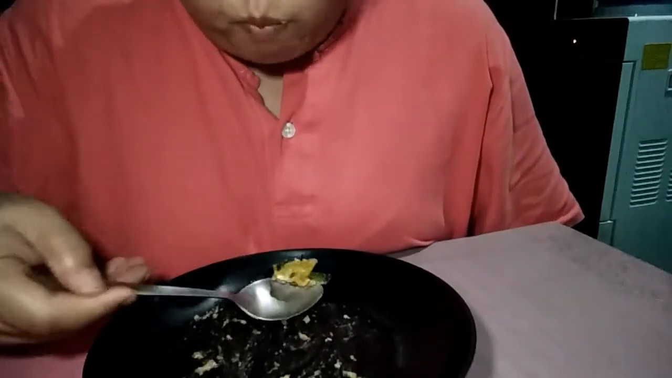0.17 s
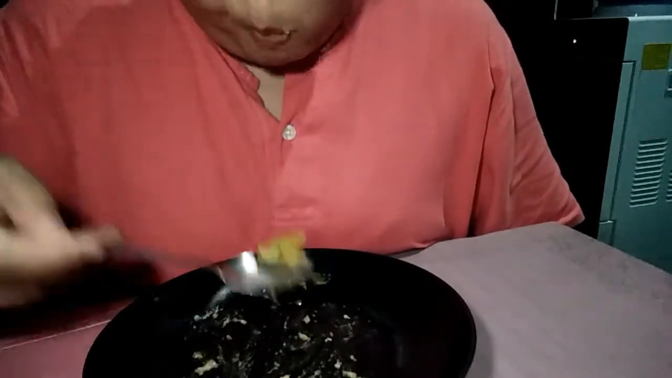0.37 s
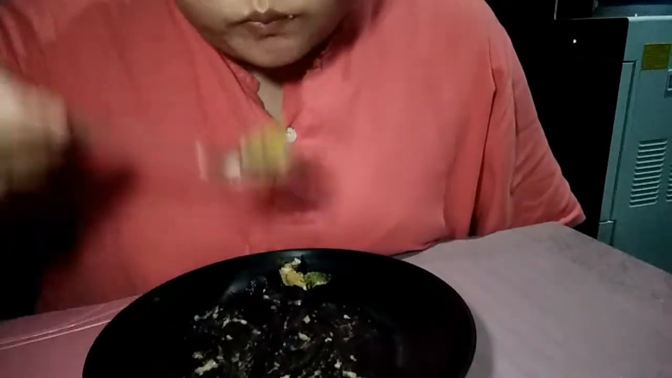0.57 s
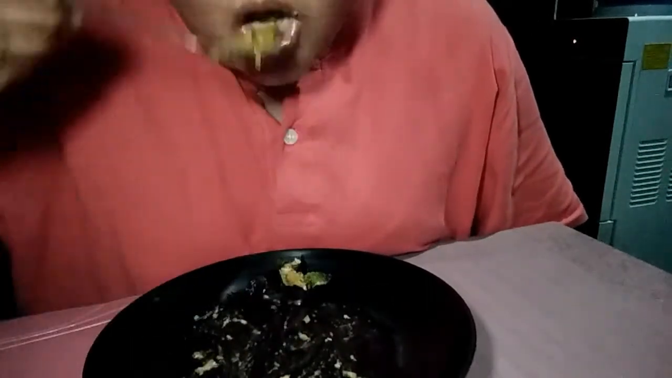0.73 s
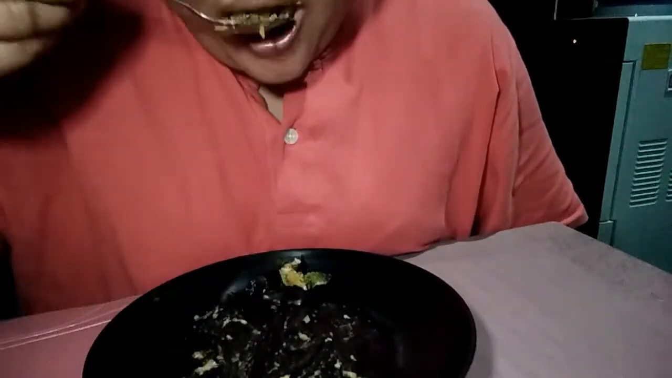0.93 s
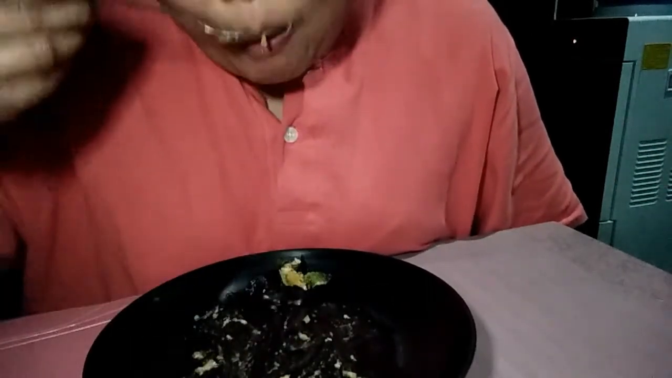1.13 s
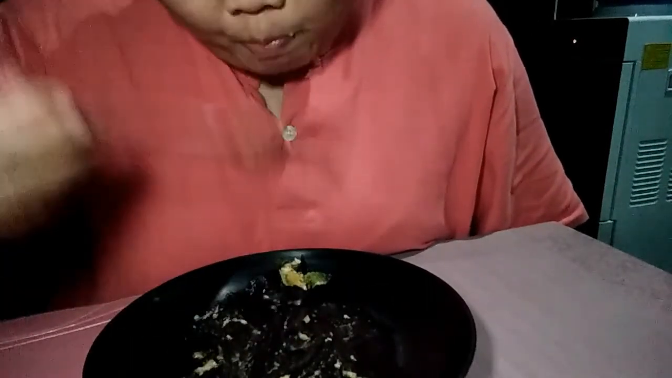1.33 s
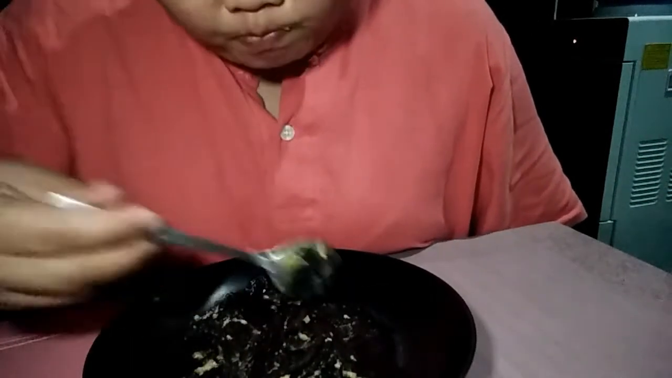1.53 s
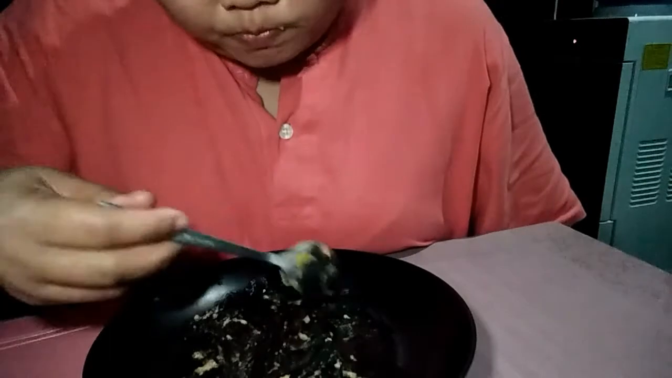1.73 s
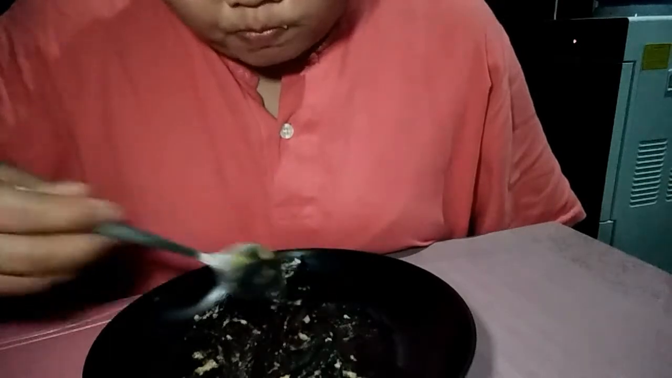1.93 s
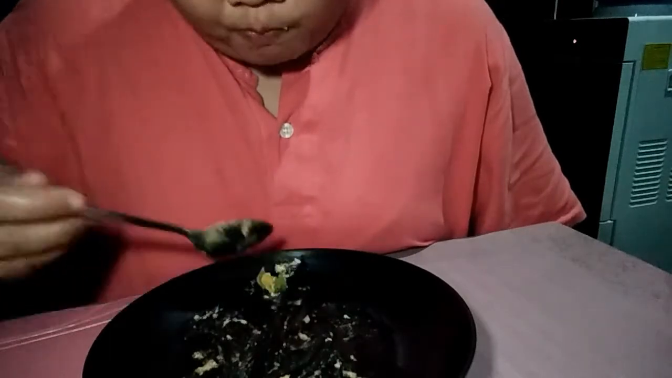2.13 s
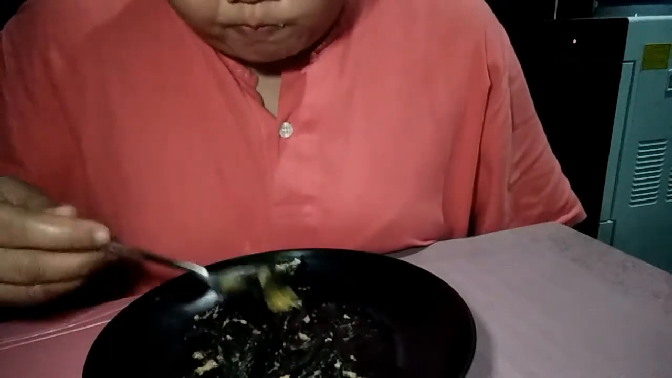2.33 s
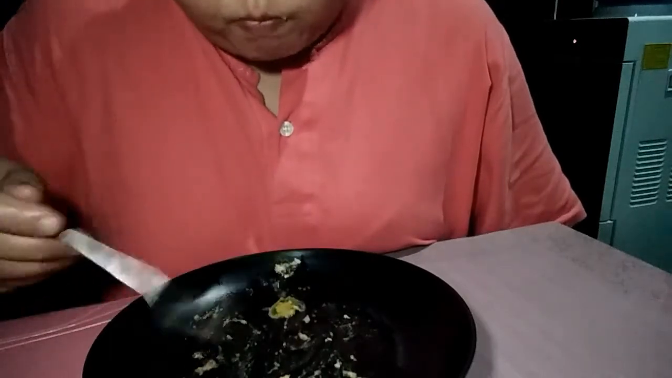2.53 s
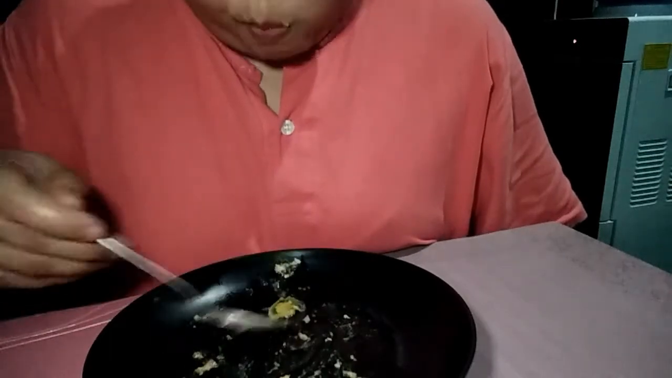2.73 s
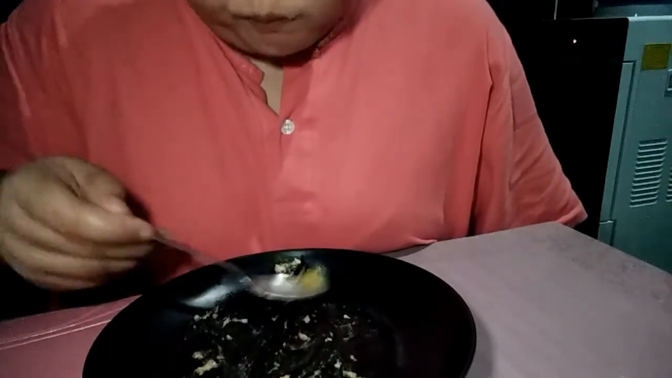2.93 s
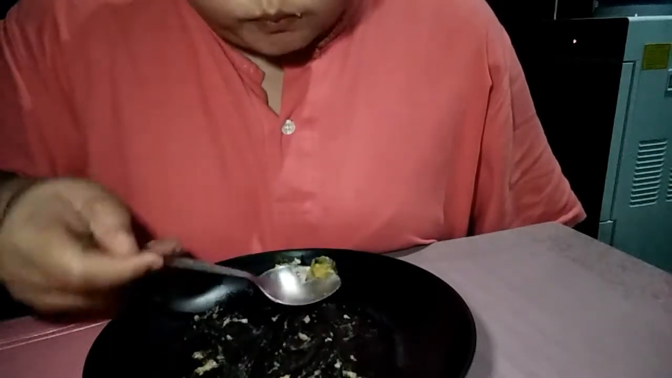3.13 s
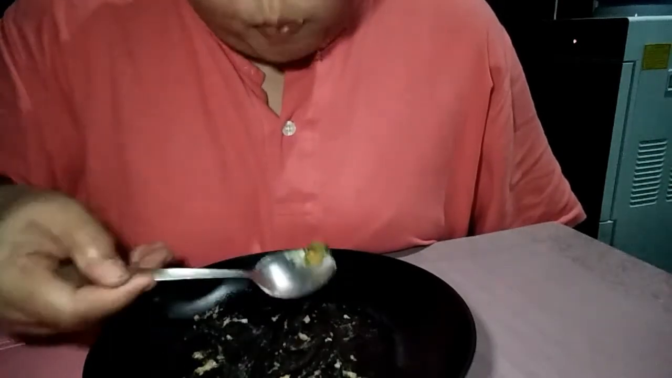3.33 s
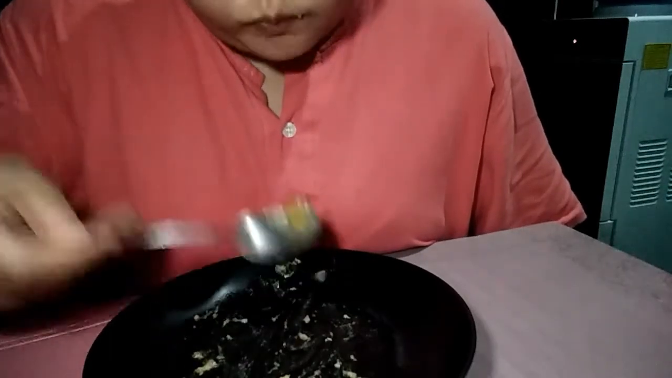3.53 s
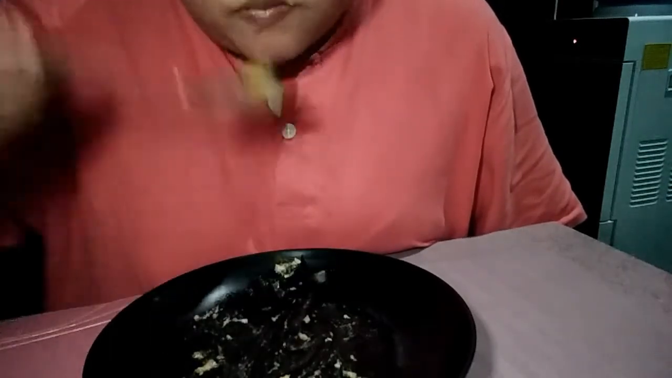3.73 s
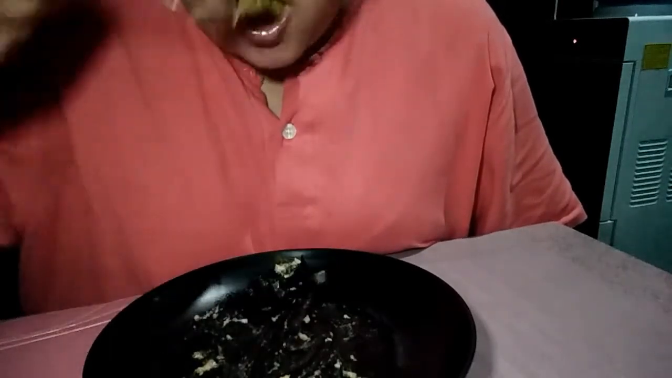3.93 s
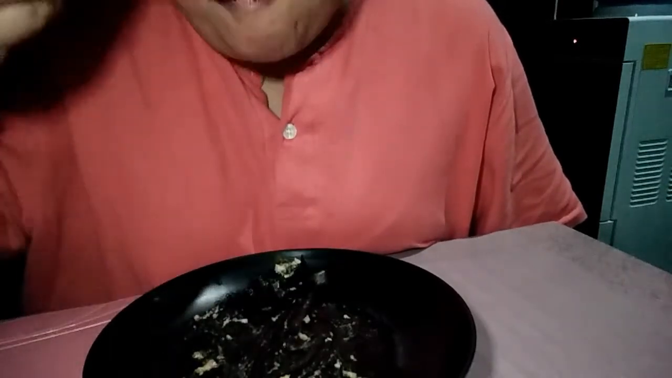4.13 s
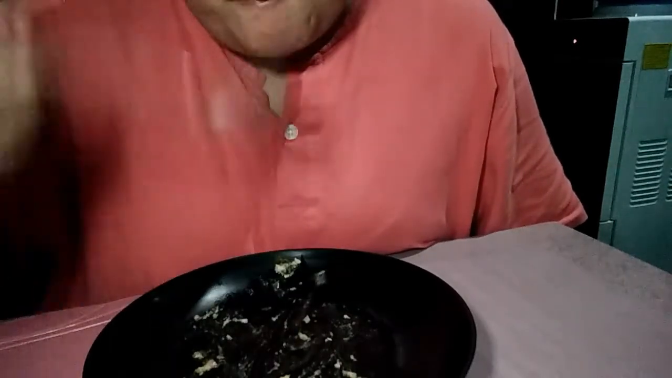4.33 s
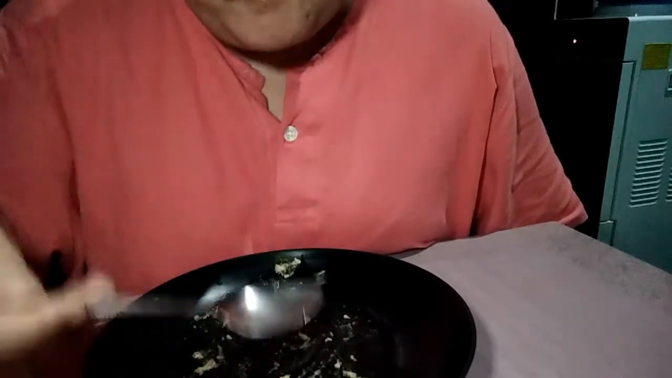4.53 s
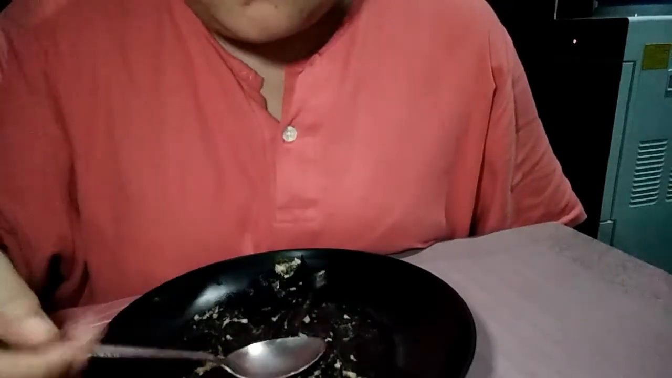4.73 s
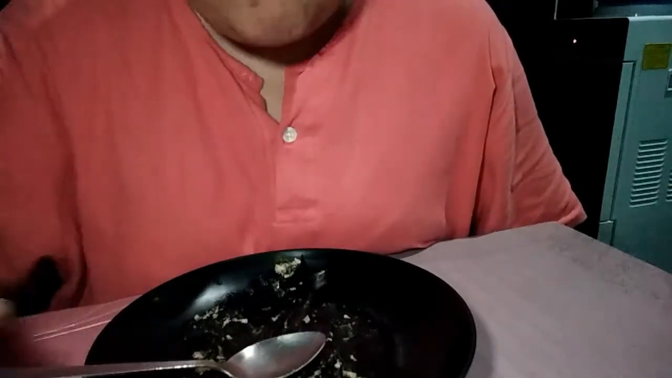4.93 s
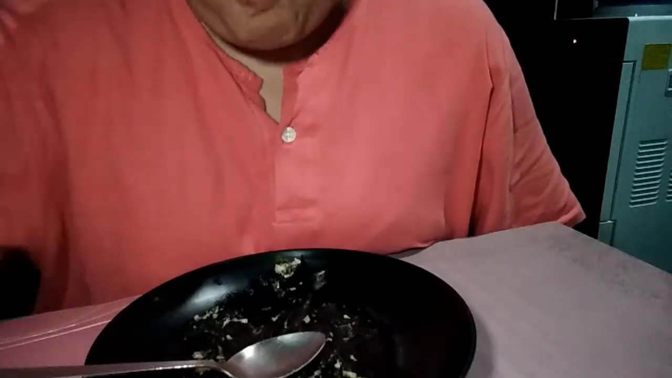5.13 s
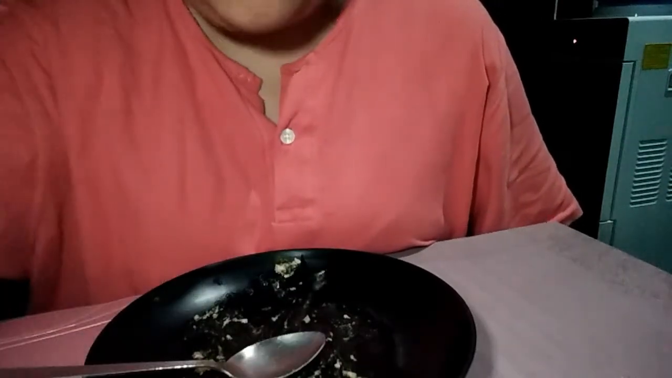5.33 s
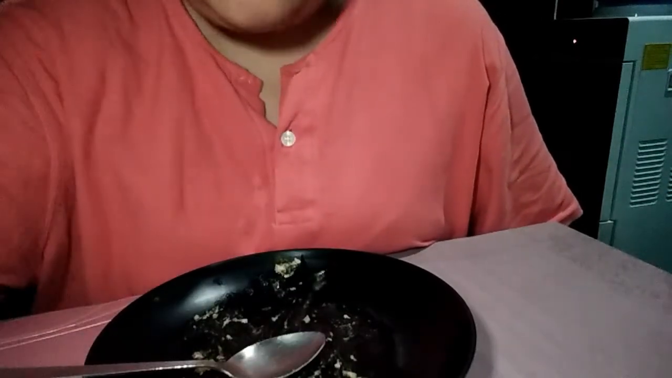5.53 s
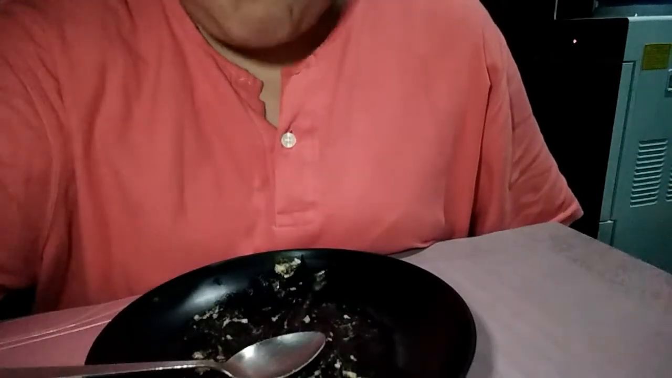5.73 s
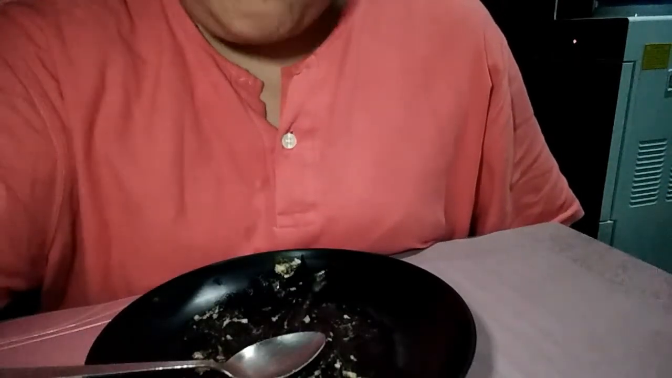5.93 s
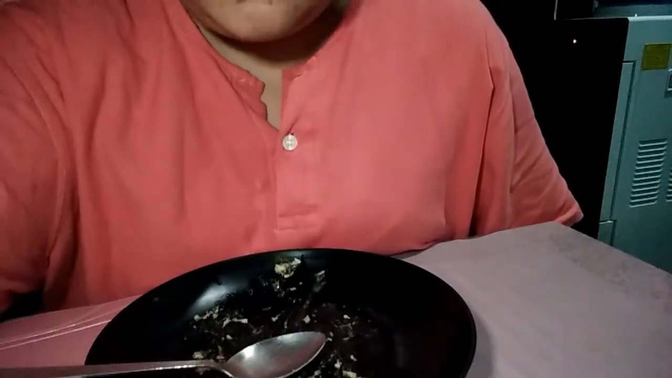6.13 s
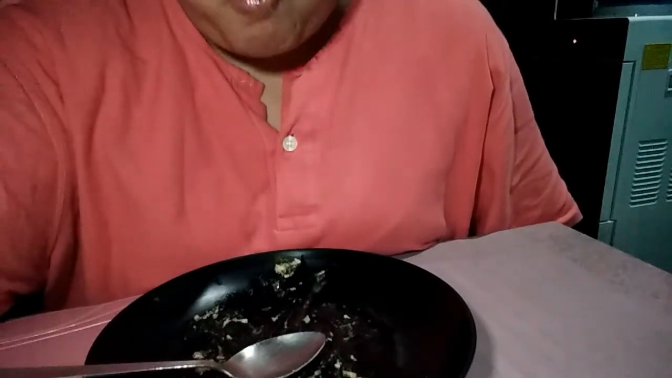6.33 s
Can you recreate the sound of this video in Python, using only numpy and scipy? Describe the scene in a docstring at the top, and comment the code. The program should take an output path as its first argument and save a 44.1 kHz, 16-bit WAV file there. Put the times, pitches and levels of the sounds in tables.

```python
"""Spoon on a plate

Ticks and a fine rustle at the mouth come before and after a steel spoon taps and scrapes a plate three times;
then it is dropped on the rim, where it bounces. Scrapes and blows are noisy forces on resonant bodies.
Ticks are damped tones, the rustle is swelling noise. Noise tails make a small room, over a faint machine hum and
a dull rush of air; a suppressor trims faint treble. The sound is narrow below about 4 kHz, wide in the treble."""
import sys
import numpy as np
from scipy import signal
from scipy.fft import rfft, irfft, next_fast_len
from scipy.io import wavfile
from scipy.ndimage import uniform_filter1d, map_coordinates

SR = 44100
rng = np.random.default_rng(int(sys.argv[2]) if len(sys.argv) > 2 else 0)


def wav_record(signal):
    """Record a signal, one row per channel, as 16-bit PCM in the file named by sys.argv[1]."""
    frames = np.transpose(np.atleast_2d(signal))
    bounded = np.clip(frames, -1, 1)
    # unit amplitude maps onto the largest positive 16-bit level
    quanta = np.round(bounded * 32767).astype(np.int16)
    wavfile.write(sys.argv[1], SR, quanta)


N = 286209

# hard blows: start_s, edge_force_db, then over that force neck_db, bowl_db, rim_db, plate_db;
# free_ring_db, contact_ms
BLOWS = [(1.7438, 3, 1.5, 8.5, 14.8, 13, -59, 0.55), (2.3431, -6.5, 1.5, 1, 17.7, 14.5, -69, .27),
         (2.705, -19, 5, 22, 28.4, 23, -75, .77), (4.8898, 14, -6, -0.5, 11, -11.5, -32, 2.4),
         (4.9206, 9, -8, -5, 9.7, -6.5, -45, 1.3), (4.9393, 1.5, -2, 0, 15.4, -5, -40, 1.8),
         (4.953, -15.5, -8, 5, 25, 13, -77, 2.5)]
# resonances of the plate's centre: pitch_hz, width_hz, level_db
PLATE = [(424, 53, -14.5), (610, 150, -9.5), (708, 76, -4), (936, 130, 4.5), (1066, 280, 0.5),
         (1253, 180, 1)]
# resonances of the plate's rim: pitch_hz, width_hz, level_db
RIM = [(1267, 82, -11), (1842, 70, 1), (2317, 150, -5.5), (2777, 120, -7.5), (3435, 120, -11)]
# resonances of the spoon's bowl: pitch_hz, width_hz, level_db
BOWL = [(2777, 95, -2), (3074, 170, -5), (3568, 72, 0), (3830, 180, -5.5), (4207, 110, 0.5),
        (4600, 130, -4)]
# resonances of the spoon's edge: pitch_hz, width_hz, level_db
EDGE = [(8150, 1100, 2), (9480, 400, 5.5), (10160, 110, 2), (10260, 360, 2), (11430, 600, -3.5),
        (12100, 220, -5), (12910, 400, -5)]
# resonances of the spoon's neck: pitch_hz, width_hz, level_db
NECK = [(5300, 350, -3), (5850, 350, -3), (6540, 350, 0), (7100, 450, -1)]


def scraping():
    """Friction: slips of the sliding edge excite the resonances of spoon and plate."""
    # strokes over the glaze: pressure of the edge as (time_s, hiss_db) points;
    # then, by the hold of the spoon, levels over the hiss: (neck_db, upper_bowl_db, lower_bowl_db, plate_db)
    strokes = [ ([(1.757, -48), (1.8, -55), (1.833, -48), (1.86, -51), (1.887, -52)], (-1, -6, -13, -4.5)),
               ([(1.887, -55), (1.92, -49.5), (1.945, -50), (1.965, -48), (1.973, -56.5)],
               (-3.5, -9, -11.5, -5.5)), ([(2.35, -42.5), (2.38, -40.5)], (1.5, -10, -10, -6)),
               ([(2.38, -44.5), (2.395, -39), (2.415, -35), (2.433, -37.5), (2.447, -62)],
               (-3, -2.5, -7.5, -9.5)), ([(2.72, -61), (2.775, -65.5), (2.8, -63), (2.82, -60)],
               (-13.5, -9.5, -5.5, 2)), ([(2.82, -56), (2.83, -52), (2.855, -57.5), (2.862, -59),
               (2.872, -61.5), (2.895, -64), (2.91, -68)], (-12.5, -3.5, 0, -11)), ([(2.915, -49.5),
               (2.92, -56.5), (2.935, -60), (2.945, -62.5)], (-9.5, 1.5, -4.5, -8.5)), ([(2.947, -61),
               (2.96, -55.5), (2.978, -59.5), (2.993, -58), (3.015, -66)], (4.5, 4, -0.5, -5)),
               ([(3.015, -60.5), (3.031, -41.5), (3.058, -34), (3.074, -40.5), (3.096, -57.5), (3.11, -66)],
               (-6.5, -9, -12, -19.5)), ([(4.81, -69.5), (4.835, -64), (4.853, -56), (4.88, -66.5)],
               (-16, -24, -19, -6.5)), ]
    # the edge's top modes lie under the hiss at a firm pressure and grow more slowly than it
    firm_db, top_under_db, top_growth = -50.5, -8.5, 0.83
    rim_db = -3.5  # the rim under the plate's centre
    chatter_db, chatter_s = 14.5, 0.035  # the plate shakes harder just after a blow
    wander_db, wander_hz = 0.5, 23  # each share drifts as the contact moves
    slips = grit(rough_db=1.9, patchy_db=2.6)
    bodies = EDGE[:4], EDGE[4:], NECK, BOWL[2:], BOWL[:2], PLATE, RIM[1:3]
    drive = np.zeros((len(bodies), N))
    t = np.arange(N) / SR
    for pressure, (neck_db, upper_db, lower_db, plate_db) in strokes:
        db, = curves(pressure)
        top_db = firm_db + top_under_db + top_growth * (db - firm_db)
        spoon = [db, top_db, db + neck_db, db + upper_db, db + lower_db]
        drive += amp(spoon + [db + plate_db, db + plate_db + rim_db])
    shake_db = sum(chatter_db * np.exp(-np.abs(t - s) / chatter_s) * (t > s) for s, *_ in BLOWS)
    drive[-2:] *= amp(shake_db)
    drive[1:] *= amp([wander_db * wobble(wander_hz) for _ in bodies[1:]])
    out = np.zeros(N)
    for force, body in zip(drive, bodies):
        out += through(force * slips, body) / np.std(through(slips, body))
    return out


def blows():
    """Impact: brief forces excite steel and plate; the freed spoon and the table decay in damped modes."""
    # modes of the free spoon: pitch_hz, level_db, t60_s
    steel = [(4190, -7, .13), (7448, -2, .36), (8900, -5, .07), (9838, 0, .1), (12110, -10, .06)]
    # modes of the table: pitch_hz, level_db, t60_s
    table_top = [(91, -2, 0.049), (167.4, 2.5, 0.075), (199.4, -5, 0.032), (276, -1.5, 0.067),
                 (323, -5, 0.05), (479.7, -2.5, 0.04), (640, -6, 0.065)]
    # soft touches around a blow, or of the hand: start_s, plate_force_db, table_thump_db, contact_ms
    touches = [(1.7368, 1, -42.5, .36), (2.335, -4, -51.5, 0.71), (2.7, -22, -50.5, 0.54),
               (4.783, -10, -32.5, 4.2), (4.883, -9.5, -38, 1.9), (4.905, -20, -40, 2.5)]
    bodies = EDGE, NECK, BOWL, RIM, PLATE
    drive = np.zeros((len(bodies), N))
    out = np.zeros(N + SR)
    t = np.arange(SR // 2) / SR
    ring_rise, thump_rise = 1 - np.exp(-t / 0.011), 1 - np.exp(-t / 0.0039)
    for s, db, *parts_db, ring_db, ms in BLOWS:
        start = round(s * SR)
        force_db = db + np.array([0, *parts_db])
        drive[:, start:][:, :SR // 20] += amp(force_db)[:, None] * contact(ms, count=len(bodies))
        out[start:][:len(t)] += amp(ring_db) * ring_rise * ringing(steel, t)
    for s, plate_db, thump_db, ms in touches:
        start = round(s * SR)
        drive[-1, start:][:SR // 20] += amp(plate_db) * contact(ms, count=1)[0]
        thump = thump_rise * ringing(table_top, t) * (1 + 0.5 * wobble(150)[:len(t)])
        out[start:][:len(t)] += amp(thump_db) * thump
    return out[:N] + sum(through(force, body) for force, body in zip(drive, bodies))


def contact(ms, count):
    """Contact force: a short rattle for each body, with its hardest touch at the height of the contact."""
    u = np.arange(SR // 20) / SR * 1000 / max(ms, 0.05)  # time in contact lengths
    force = u * np.exp(1 - u) * rng.standard_normal((count, len(u)))
    force /= np.linalg.norm(force, axis=1, keepdims=True)
    force[:, round(ms * SR / 1000)] += 1.037 / np.sqrt(ms)
    return force


def ringing(modes, t):
    """Free vibration: exponentially damped modes, at new strengths each time."""
    scatter_db = rng.normal(0, 1.5, len(modes))
    return sum(amp(db + more - 60 * t / t60) * np.sin(2 * np.pi * hz * t)
               for (hz, db, t60), more in zip(modes, scatter_db))


def through(x, modes):
    """Forced resonance: x drives a body that radiates little above its top mode or below its lowest."""
    low, top = modes[0][0], modes[-1][0]

    def response(f):
        peaks = 0
        for k, (hz, width, db) in enumerate(modes):  # neighbours have opposite signs
            peaks = peaks + (-1) ** k * amp(db) * 1j * f * width / (hz * hz - f * f + 1j * f * width)
        return peaks / (1 + 1j * f / top) ** 2 * 1j * f / (low + 1j * f)

    return filtered(x, response)


def ticks():
    """Damped oscillation: each tick is a decaying tone, roughened by noise a few cycles long."""
    # small ticks of spoon, lips and table: start_s, level_db, pitch_hz, t60_s
    tick_list = [(0.416, -39, 1726, 0.018), (0.7658, -37, 6500, 0.0046), (0.775, -42, 9100, 0.0075),
                 (0.7796, -45.5, 2040, 0.0094), (0.7806, -38, 9200, 0.014), (0.779, -40, 6030, 0.0087),
                 (0.8247, -46, 2130, 0.0081), (0.823, -48, 5300, 0.0051), (0.86, -45.5, 8600, 0.01),
                 (0.8844, -55, 7600, 0.0075), (3.8427, -45, 9060, 0.0066), (3.882, -44, 9500, 0.0034),
                 (3.942, -35.5, 10610, 0.0044), (4.0158, -42, 8760, 0.0085), (4.026, -41, 10100, 0.0052),
                 (4.0653, -45, 6940, .01), (5.455, -41, 817, 0.025), (5.8718, -32, 2054, 0.0065),
                 (5.873, -28.5, 1340, 0.015), (5.878, -62, 8850, 0.0072), (6.3717, -52.5, 2370, 0.019),
                 (6.4227, -55, 9400, 0.0064)]
    out = np.zeros(N + SR)
    t = np.arange(SR // 10) / SR
    for s, db, hz, t60 in tick_list:
        rough = map_coordinates(rng.standard_normal(len(t)), [t * hz * 0.4])
        tone = np.sin(2 * np.pi * hz * t) * (0.75 + 0.18 * rough)
        onset = 1 - np.exp(-t * hz)
        out[round(s * SR):][:len(t)] += amp(db - 60 * t / t60) * tone * onset
    return out[:N]


def rustle():
    """Shaped noise: a fine treble fizz in overlapping exponential swells, perhaps lips and cloth."""
    # swells: loudest_s, level_db, rise_s, fall_s (rise and fall each over 20 dB)
    swells = [(0.772, -54.5, 0.011, 0.14), (0.86, -67, .005, .09), (3.338, -64.5, .012, 0.027),
              (3.35, -74, 0.098, 0.19), (3.87, -66.5, 0.23, 0.22), (3.942, -56, 0.016, 0.078),
              (4.018, -55.5, 0.0049, .035), (4.17, -69, 0.33, 0.13), (4.49, -73, 0.048, .4),
              (4.66, -81, 0.22, 0.041), (4.793, -57.5, .03, 0.028), (5.79, -77, 0.24, 0.045),
              (5.874, -67.5, .03, 0.066), (6.32, -76.5, .045, 0.14), (6.424, -77, 0.022, 0.037)]
    # spectrum of the fizz: pitch_hz, relative_level_db
    fizz_shape = [(2650, -43.5), (4500, -13), (4750, -23), (8840, -3.5), (10800, -9.5), (11300, -10),
                  (13700, -13.5), (14500, -9.5)]
    t = np.arange(N) / SR
    level = sum(amp(db - 20 * np.where(t < s, (s - t) / rise, (t - s) / fall))
                for s, db, rise, fall in swells)
    fizz = filtered(grit(rough_db=2.0, patchy_db=0.5), lambda hz: amp(along(fizz_shape, hz)))
    return level * unit(fizz)


def background():
    """Broadband and tonal noise: dull patchy air, fuzzy narrow bands and an unsteady harmonic machine hum."""
    # spectrum of the rush: pitch_hz, relative_level_db
    air_shape = [(12, -52), (20, -24.5), (27, -15), (87, -13), (151, -8), (174, -28), (302, -9),
                 (377, -21.5), (433, -11), (638, -15), (818, -7), (1590, -10.5), (3360, -35.5), (9370, -37),
                 (15000, -38)]
    # mean levels over time: time_s, rush_db, upper_band_db
    air_level = [(0, -67, -86), (1.4, -66, -81), (3.5, -67.5, -79.5), (4.5, -66, -82.5), (5.7, -65.5, -85),
                 (6.49, -64.5, -76.5)]
    # fuzzy wavering tones in the rush: pitch_hz, width_hz, mean_level_db
    drones = [(572, 75, -78), (822, 54, -75.5), (957, 85, -87), (1330, 29, -85.5), (1750, 100, -91)]
    # partials of the hum: pitch_hz, mean_peak_db
    hum_partials = [(148.3, -75), (296.6, -85.5), (445, -77), (593, -82), (890, -82)]
    low_db, high_db = curves(air_level)
    rush = filtered(grit(rough_db=-0.4, patchy_db=2.5), lambda hz: amp(along(air_shape, hz)))
    upper = filtered(rng.standard_normal(N), lambda hz: np.exp(-(np.log((hz + 1) / 2400) / 0.3) ** 2))
    out = amp(low_db + 0.6 * wobble(2.5)) * unit(rush)
    out += amp(high_db + 3.5 * wobble(1.6)) * unit(upper)
    for hz, width_hz, db in drones:
        narrow = filtered(rng.standard_normal(N), lambda f: np.exp(-((f - hz) / width_hz) ** 2))
        out += amp(db + 3.2 * wobble(3.8)) * unit(narrow)
    t = np.arange(N) / SR
    drift = 0.88 * wobble(3.6)  # radians, at the first partial
    for k, (hz, db) in enumerate(hum_partials, 1):
        out += amp(db + 2.2 * wobble(2.1)) * np.sin(2 * np.pi * hz * t + k * drift)
    return out


def grit(rough_db, patchy_db):
    """Modulated noise: its level clumps in time while its colour wanders in patches."""
    noise = rng.standard_normal(N + 512) * amp(rough_db * np.pad(wobble(400), (0, 512)))
    z = signal.stft(noise, nperseg=256)[2]
    field = uniform_filter1d(rng.standard_normal(z.shape), size=4, axis=0)
    field = uniform_filter1d(field, size=8, axis=1)
    return signal.istft(z * amp(patchy_db * unit(field)), nperseg=256)[1][:N]


def tail(t60s):
    """Diffuse decay: a noise response of energy 1, each frequency dying at its own speed."""
    hz, t, z = signal.stft(rng.standard_normal(SR // 2), SR, nperseg=256)
    answer = signal.istft(z * amp(-60 * t / along(t60s, hz)[:, None]), SR, nperseg=256)[1]
    return answer / np.linalg.norm(answer)


def echo(x, t60s, delay, count=1):
    """Reverberation by convolution, delay samples late; each of count stretches has its own tail."""
    step = N // count + 1  # a fresh noise tail for each stretch keeps the echo smooth
    out = np.zeros(N + SR + delay)
    for i in range(0, N, step):
        part = signal.fftconvolve(x[i:i + step], tail(t60s))
        out[i + delay:][:len(part)] += part
    return out[:N]


def scattered(x):
    """Decorrelation: random phase in every short patch makes a similar sound unrelated to x."""
    z = signal.stft(x, nperseg=128)[2]
    return signal.istft(z * np.exp(2j * np.pi * rng.random(z.shape)), nperseg=128)[1][:N]


def suppressed(x):
    """Spectral gating: the noise suppressor shuts off faint treble, so that tails end early."""
    gate_db, gate_hz = -101, 2893  # patches weaker than this, above this pitch, are turned down
    hz, _, z = signal.stft(x, SR, nperseg=512)
    power = uniform_filter1d(np.abs(z) ** 2, size=24, axis=0)
    power = np.abs(uniform_filter1d(power, size=3, axis=1)) + 1e-30
    gain = 1 / (1 + (amp(gate_db) ** 2 / power) ** 2 * (hz > gate_hz)[:, None])
    return signal.istft(z * gain, nperseg=512)[1][:N]


def amp(db):
    """Logarithmic level: decibels to gain."""
    return 10 ** (np.asarray(db) / 20)


def unit(x):
    """Normalisation of power: x scaled to rms 1."""
    return x / np.sqrt(np.mean(x ** 2) + 1e-30)


def along(points, hz):
    """Logarithmic pitch: (pitch_hz, value) points interpolated on a log axis."""
    f, v = np.transpose(points)
    return np.interp(np.log(hz + 1), np.log(f + 1), v)


def curves(rows):
    """Level envelopes: one dB value per sample for each column after the time; -150 dB outside."""
    s, *columns = np.transpose(rows)
    return [np.interp(np.arange(N) / SR, s, column, -150, -150) for column in columns]


def wobble(rate):
    """Slow random modulation: a smooth curve through rate random knots a second."""
    return map_coordinates(rng.standard_normal(int(N * rate / SR) + 4), [np.arange(N) * rate / SR])


def filtered(x, response):
    """Linear filtering: the spectrum of x times a response of frequency."""
    m = next_fast_len(N + SR // 2)
    return irfft(rfft(x, m) * response(np.fft.rfftfreq(m, 1 / SR)), m)[..., :N]


def scene():
    """Superposition of near sounds, table top, room and background; a decorrelated side widens the treble."""
    # decay of the room: pitch_hz, t60_s
    room = [(150, 0.57), (1000, 0.37), (4000, 0.34), (12000, 0.4)]
    # filter of the left-right difference, narrow below about 4 kHz: pitch_hz, gain_db
    side_level = [(3000, -64), (3650, -62), (4000, -22), (5000, -11), (8000, -6), (14000, -6)]
    hits = blows() + ticks()
    table_echo = echo(hits, [(1000, 0.036)], SR // 1000)
    near = hits + amp(-3.0) * table_echo + scraping() + rustle()
    room_echo = echo(near, room, SR // 150, count=24)
    mid = suppressed(near + amp(-11) * room_echo) + background()
    apart = 0.91 * scattered(mid) + 0.5 * echo(mid, [(1000, 0.02)], 1)
    side = filtered(apart, lambda hz: amp(along(side_level, hz)))
    return np.array([mid + side, mid - side])


def record(dry):
    """Band limiting: the microphone fades at the very top and nothing passes above the limit."""
    # response of the microphone: pitch_hz, gain_db
    microphone = [(20, -9), (45, -4.5), (14150, -1.5), (14350, -26), (15500, -19.5)]
    top_hz = 15600
    return filtered(dry, lambda hz: amp(along(microphone, hz)) * (hz < top_hz))


dry = scene()
out = record(dry)
wav_record(out)
```